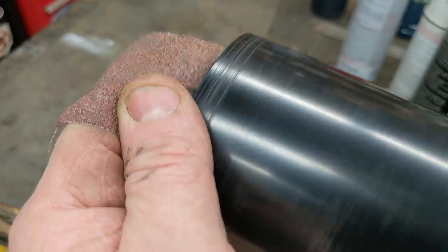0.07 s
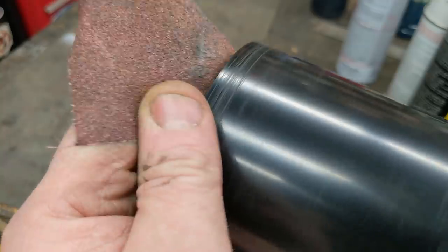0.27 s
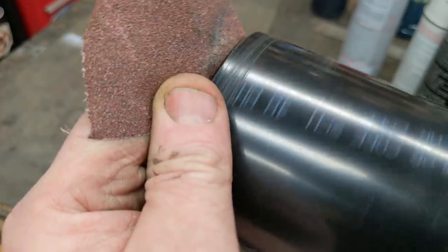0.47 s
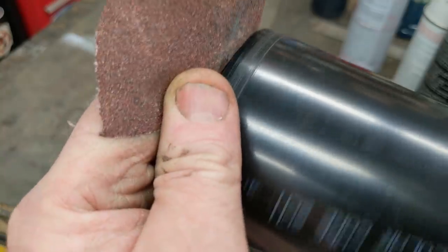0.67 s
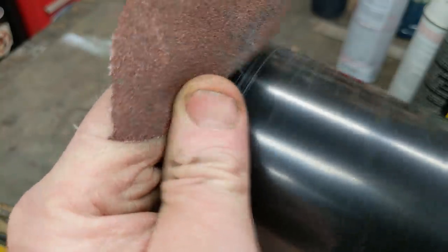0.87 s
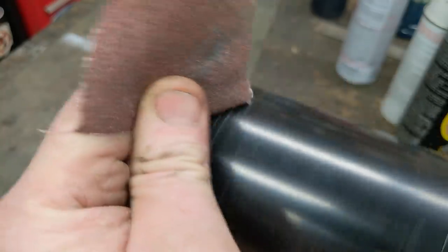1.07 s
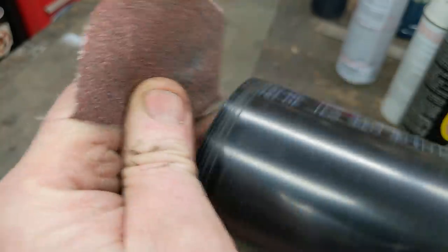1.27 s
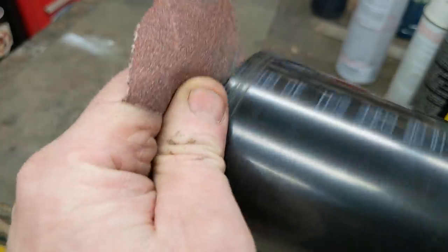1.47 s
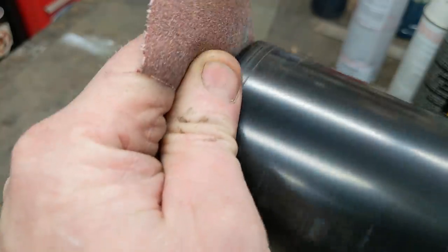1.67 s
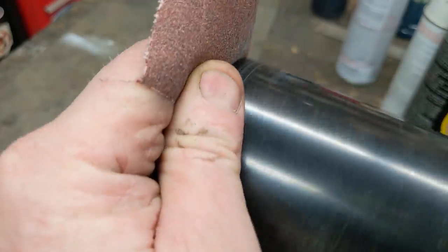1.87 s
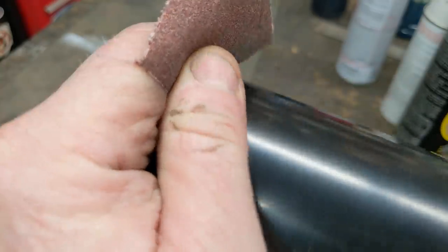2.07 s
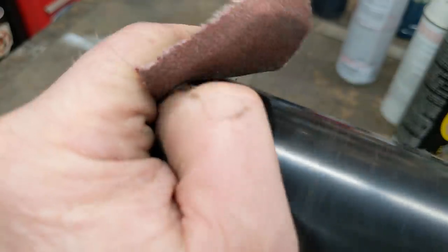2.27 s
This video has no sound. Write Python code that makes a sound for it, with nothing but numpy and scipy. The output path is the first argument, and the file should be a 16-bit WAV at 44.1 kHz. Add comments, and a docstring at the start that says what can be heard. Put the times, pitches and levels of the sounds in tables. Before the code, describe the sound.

Sandpaper scratches the rim of a plastic pipe spun by a drill that slows, surges and brakes with a clack

```python
"""A gear whine falls from a high pitch over rasping grit: a cordless drill spins a plastic pipe against sandpaper.
The trigger is eased, nearly released and squeezed again; whine and rattle ring the drill housing.
The grit rasps and hisses with a slight wobble and a few surges, and rings the pipe wall; the pipe's air hums low.
Soft low thumps are heard; the drill brakes with a clack and the air in the pipe rings on.
Tones, shaped noise and resonances make every source; a small workshop adds a tail and a quiet floor."""
import sys
import numpy as np
from scipy import signal
from scipy.fft import rfft, irfft
from scipy.io import wavfile
from scipy.ndimage import uniform_filter1d

SR = 44100
rng = np.random.default_rng(int(sys.argv[2]) if len(sys.argv) > 2 else 0)


def bounce(signal):
    """Save signal as a 16-bit WAV file at the path given by the first command-line argument."""
    frames = np.transpose(np.atleast_2d(signal))
    limited = np.clip(frames, -1, 1)
    pcm = np.round(limited * 32767).astype(np.int16)
    wavfile.write(sys.argv[1], SR, pcm)


N = 102444  # length [samples]


def undb(db):
    """Decibels to gain."""
    return 10 ** (np.asarray(db) / 20)


def unit(x):
    """Scale to rms 1."""
    return x / np.sqrt(np.mean(x ** 2))


def curve(table, axis):
    """One column of a timed table, drawn as straight lines sample by sample."""
    rows = np.array(table, float)
    return np.interp(np.arange(N) / SR, rows[:, 0], rows[:, axis])


def walk(rate):
    """Smooth random drift with spread near 1, heading for a new value `rate` times a second."""
    hold = max(int(SR / rate), 1)
    steps = np.repeat(rng.standard_normal(N // hold + 2), hold)
    drift = unit(uniform_filter1d(steps, hold))
    return drift[rng.integers(hold):][:N]


def colour(x, points):
    """Causal minimum-phase filter through (frequency [Hz], level [dB]) points; keeps white noise's power."""
    size = 4096
    hz, db = np.array(points, float).T
    bins_hz = np.arange(size // 2 + 1) * SR / size
    gain = unit(undb(np.interp(np.log(bins_hz + 1), np.log(hz), db)))
    # Fold the cepstrum forward in time so that the filter is causal
    cepstrum = irfft(np.log(gain))
    cepstrum[1:size // 2] *= 2
    cepstrum[size // 2 + 1:] = 0
    impulse = irfft(np.exp(rfft(cepstrum)))
    return signal.fftconvolve(x, impulse)[:N]


def ring(x, hz, width):
    """One resonance, gain 1 at its centre."""
    return signal.lfilter(*signal.iirpeak(hz, hz / width, fs=SR), x)


def grains(spread_db):
    """Dense tiny impacts of very uneven size."""
    sizes = undb(spread_db * rng.standard_normal(N))
    return unit(rng.standard_normal(N) * sizes)


# Trigger moves: (time [s], gear mesh rate [Hz], relative whine level [dB], relative rattle level [dB])
TRIGGER = [(0, 1354, 1.5, 5), (.09, 1268, -5, 4.5), (.18, 956, -3, -13), (.255, 587.6, -1.5, 4),
           (.315, 333, -0.5, 7), (.365, 298.6, -4.5, 2.5), (.39, 236.8, -7, 6), (.43, 234, 4, 4.5),
           (.5, 244, -4, 3.5), (.72, 250.8, -0.5, 1.5), (.82, 261.8, -5.5, 1), (.93, 267.9, -3, 0),
           (1.04, 264.4, -5, 0), (1.1, 249, -4, 1), (1.125, 231.9, -8, -2), (1.22, 129.9, -15, -7),
           (1.285, 189.6, -11, -1), (1.315, 246.4, -2.5, 8), (1.345, 322.5, 5.5, 7.5),
           (1.365, 490, -2, 5.5), (1.405, 629.7, -1, 6), (1.43, 962, -3, 5), (1.47, 1081, 4, -13),
           (1.58, 1046, 2, -12), (1.73, 1060, 3.5, -5), (1.775, 995, -11, -15), (1.86, 908, -1.5, -3),
           (1.94, 790, -1, 1.5), (1.952, 635.7, 1.5, 9.5), (2.0, 395, -1, 3.5), (2.025, 147.1, -28, -13),
           (2.06, 39.3, -50, -45.5)]
# Gear tones: (multiple of the mesh rate, relative level [dB])
GEAR_TONES = [(.3, -14), (.9, -14.5), (1, 0), (2, -8), (2.5, -6.5), (2.8, -9), (3, -8.5), (3.7, -15),
              (4, -5), (5, -15.5), (7, -22.5), (13, -22)]
WHINE_DB, RATTLE_DB = -30, -26
WHINE_JITTER, WHINE_FLUTTER_DB = .004, 3  # jitter as a fraction of the mesh rate
RATTLE_SPREAD_DB = 3.5


def gears(mesh):
    """Meshing teeth whine in fluttering multiples of the mesh rate and rattle in a burst at every mesh."""
    whine = 0
    for multiple, db in GEAR_TONES:
        slip = np.cumsum(curve(TRIGGER, axis=1) * WHINE_JITTER * walk(120)) / SR
        level = undb(db + WHINE_FLUTTER_DB * walk(54.39))
        whine = whine + level * np.sin(2 * np.pi * multiple * (mesh + slip))
    fade_per_mesh = np.exp(-(mesh % 1) / 0.42)
    rattle = unit(grains(RATTLE_SPREAD_DB) * fade_per_mesh)
    whine = undb(WHINE_DB + curve(TRIGGER, axis=2)) * whine
    rattle = undb(RATTLE_DB + curve(TRIGGER, axis=3)) * rattle
    return body(whine + rattle)


# Resonances of the drill housing: (frequency [Hz], width [Hz], gain [dB])
HOUSING = [(514, 30, -8.5), (646, 100, -9.5), (765, 46, -8), (987, 101, 5), (1135, 56, -7.5),
           (1327, 140, -7.5), (1493, 164, -1), (1704, 190, -8.5), (1920, 120, -10.5), (3142, 47, 2.5),
           (3372, 60, -1.5), (4000, 130, -4.5), (4490, 160, -29), (5760, 270, -25)]
BODY_FLOOR_DB = -30  # sound that passes without ringing
BODY_LOW_HZ = 261  # the small housing radiates little below this


def body(x):
    """The drill housing rings in its own modes with whatever shakes it."""
    x = signal.sosfilt(signal.butter(2, BODY_LOW_HZ, "high", fs=SR, output="sos"), x)
    modes = sum(undb(db) * ring(x, hz, width) for hz, width, db in HOUSING)
    return undb(BODY_FLOOR_DB) * x + modes


# Rubbing: (time [s], relative rasp level [dB], relative hiss level [dB])
RUBBING = [(0, -22.5, -29.5), (.18, -23.5, -28), (.28, -27, -36.5), (.355, -39.5, -48), (.41, -31, -40.5),
           (.8, -28.5, -36.5), (1.0, -29, -38), (1.1, -33.5, -39.5), (1.18, -41, -51), (1.225, -54, -62),
           (1.245, -37.5, -42.5), (1.285, -41, -54.5), (1.32, -26.5, -29), (1.39, -29.5, -33),
           (1.45, -25.5, -29), (1.54, -27, -27), (1.63, -25, -23), (1.7, -24.5, -26), (1.76, -27.5, -31),
           (1.85, -28, -30.5), (1.885, -37.5, -47), (1.98, -40.5, -81), (2.03, -44.5, -64), (2.1, -68, -75),
           (2.24, -81, -69), (2.32, -59.5, -64)]
# Spectrum of the coarse scratch: (frequency [Hz], relative density [dB per Hz])
RASP_SPECTRUM = [(60, -33.5), (150, -19.5), (300, -13), (600, -6), (1200, -0.5), (2500, -0.5), (3500, 2.5),
                 (5500, 0), (6600, -3), (8300, -2.5), (10500, -25), (15500, -38)]
# Spectrum of the fine scratch: (frequency [Hz], relative density [dB per Hz])
HISS_SPECTRUM = [(1000, -36), (4000, -3.5), (6500, -4.5), (8700, 2.5), (10300, -3), (13000, -5),
                 (15500, -12)]
# Modes of the pipe wall: (frequency [Hz], width [Hz], relative gain [dB])
PIPE_WALL = [(1444, 98, -17), (2170, 86, -0.5), (2850, 50, -3), (3000, 31, -14.5), (3468, 45, 4.5),
             (3510, 15.43, -19), (3810, 21, -5), (3878, 110, 2.5), (4455, 50, -1.5), (4850, 6.5, -11.5),
             (5430, 46, -0.5), (6230, 15, -6), (7500, 22, 4.5), (8310, 67, -16)]
# Surges of the rubbing, about once a turn: (time [s], extra level [dB])
RUB_SURGES = [(1.418, 10.5), (1.474, 10), (1.515, 6.5), (1.568, 5), (1.611, 4.5), (1.923, 9.5)]
SURGE_S, SURGE_RASP_SHARE = .012, 0.56  # the rasp takes only this share of the extra dB
GRIT_SPREAD_DB, GRIT_FLICKER_DB = 2.5, 0.81
MESH_PER_TURN, WOBBLE_DB = 52, .5  # the rim presses harder once a turn
RASP_DB, RASP_WALL_DB, HISS_DB = -2, -1, 1


def sandpaper(mesh):
    """Grit scratches the rim: rasp rings the pipe wall beside a fine hiss, with a slight wobble and listed surges."""
    t = np.arange(N) / SR
    wobble_db = WOBBLE_DB * np.cos(2 * np.pi * mesh / MESH_PER_TURN)
    press_db = wobble_db + GRIT_FLICKER_DB * walk(160)
    # The fourth power gives each surge a flat top and steep sides
    surge_db = sum(db * np.exp(-((t - at) / SURGE_S) ** 4 / 2) for at, db in RUB_SURGES)
    rasp_level = undb(curve(RUBBING, axis=1) + press_db + SURGE_RASP_SHARE * surge_db)
    hiss_level = undb(curve(RUBBING, axis=2) + press_db + surge_db)
    rasp = colour(grains(GRIT_SPREAD_DB) * rasp_level, RASP_SPECTRUM)
    hiss = colour(grains(GRIT_SPREAD_DB) * hiss_level, HISS_SPECTRUM)
    wall = sum(undb(db) * ring(rasp, hz, width) for hz, width, db in PIPE_WALL)
    return undb(RASP_DB) * rasp + undb(RASP_WALL_DB) * wall + undb(HISS_DB) * hiss


# Drive into the pipe's air column: (time [s], gain [dB])
AIR_DRIVE = [(0, 21), (.11, 30), (.18, 28.5), (.28, 15), (.4, 21), (.6, 13), (.88, 16.5), (1.15, 24),
             (1.33, 3), (1.45, 14), (1.55, 27.5), (1.62, 11.5), (1.69, 20), (1.88, 13.5), (1.97, 24.5)]
AIR_HZ, AIR_WIDTH_HZ = 309.4, 7.9


def pipe_air(x):
    """The air column in the pipe resonates on one low note that swells and fades."""
    return ring(x * undb(curve(AIR_DRIVE, axis=1)), AIR_HZ, AIR_WIDTH_HZ)


# Blows of the spindle lock: (time [s], relative level [dB])
LOCK_BLOWS = [(2.0012, -14), (2.009, -20)]
# Spectrum of a blow: (frequency [Hz], relative density [dB per Hz])
CLACK_SPECTRUM = [(100, -24.5), (300, 0.5), (1000, 3), (1600, -0.5), (4500, -4), (9000, -26), (15000, -39)]
CLACK_DECAY_S, CRACK_DB = 0.0018, -5  # crack: the direct sound beside the housing's ring
JOLT_DB, JOLT_T60_S = -36.5, 0.41  # the stop sets the air in the pipe ringing


def spindle_lock():
    """The spindle catches with a clack and a small rebound; the jolt leaves the pipe humming."""
    t = np.arange(N) / SR
    blows = sum(undb(db) * (t >= at) * np.exp(-np.abs(t - at) / CLACK_DECAY_S) for at, db in LOCK_BLOWS)
    crack = colour(blows * rng.standard_normal(N), CLACK_SPECTRUM)
    since = np.maximum(t - LOCK_BLOWS[0][0], 0)
    decay = np.exp(-np.log(1000) * since / JOLT_T60_S)
    hum = undb(JOLT_DB) * np.sin(2 * np.pi * AIR_HZ * since) * decay
    return undb(CRACK_DB) * crack + body(crack) + hum


# Soft low thumps: (time [s], length [s], level [dB])
LOW_THUMPS = [(0.03, .045, -42.5), (0.18, 0.022, -55), (1.89, 0.017, -47), (2.024, .012, -49)]
# Spectrum of a thump: (frequency [Hz], relative density [dB per Hz])
THUMP_SPECTRUM = [(40, -34), (100, 8.5), (200, 11), (400, -18), (1500, -39)]


def thumps():
    """Soft low thumps: bell-shaped swells of dark noise."""
    t = np.arange(N) / SR
    swell = sum(undb(db) * np.exp(-((t - at) / length) ** 2 / 2) for at, length, db in LOW_THUMPS)
    return swell * colour(rng.standard_normal(N), THUMP_SPECTRUM)


ROOM_T60_S, ROOM_DB, ROOM_TOP_HZ = 0.28, -10, 5000


def workshop(x):
    """Walls and shelves return a short, dull tail of decaying noise."""
    t = np.arange(SR // 2) / SR
    decay = np.exp(-np.log(1000) * t / ROOM_T60_S)
    tail = rng.standard_normal(len(t)) * decay * (t > .004)  # first returns after 4 ms
    tail = tail / np.sqrt(np.sum(tail ** 2))
    tail = signal.lfilter(*signal.butter(1, ROOM_TOP_HZ, fs=SR), tail)
    return x + undb(ROOM_DB) * signal.fftconvolve(x, tail)[:N]


# Spectrum of the quiet room: (frequency [Hz], relative density [dB per Hz])
FLOOR_SPECTRUM = [(25, -2), (60, 0), (110, 3), (200, -1), (500, -8.5), (1500, -10), (6000, -26),
                  (15000, -45)]
FLOOR_DB = -63


def room_floor():
    """The quiet room is a steady, mostly low noise."""
    return undb(FLOOR_DB) * colour(rng.standard_normal(N), FLOOR_SPECTRUM)


def scene():
    """Drill, sandpaper, pipe and thumps over the quiet of the room, the same in both ears."""
    mesh = np.cumsum(curve(TRIGGER, axis=1)) / SR  # teeth met so far
    work = gears(mesh) + sandpaper(mesh) + thumps()
    near = work + pipe_air(work) + spindle_lock()
    mono = workshop(near) + room_floor()
    return np.array([mono, mono])


TOP_HZ = 15400


def record(dry):
    """A steep low-pass removes the extreme treble."""
    return signal.sosfilt(signal.ellip(8, .2, 70, TOP_HZ, fs=SR, output="sos"), dry)


dry = scene()
out = record(dry)
bounce(out)
```